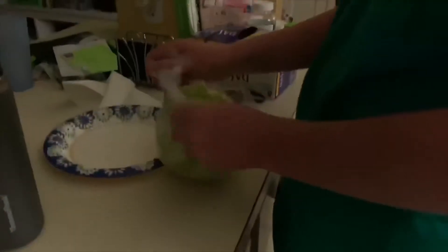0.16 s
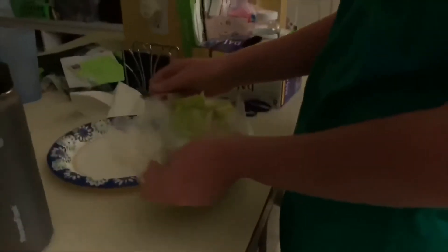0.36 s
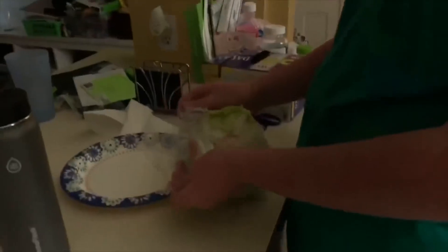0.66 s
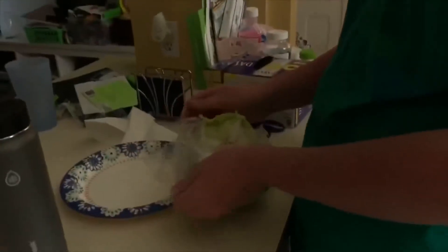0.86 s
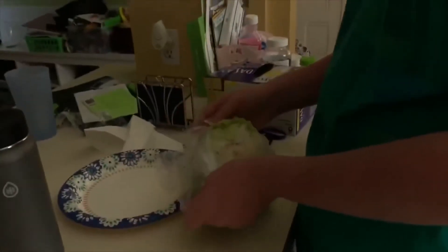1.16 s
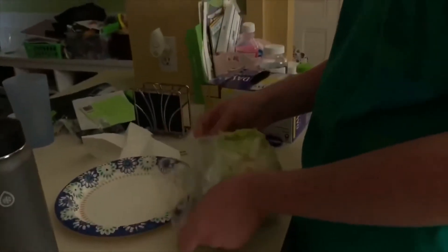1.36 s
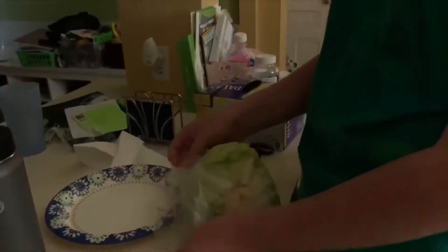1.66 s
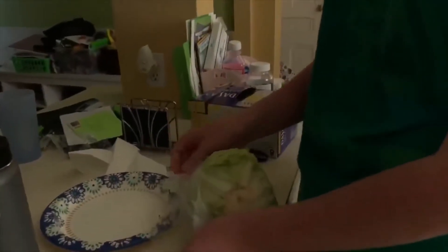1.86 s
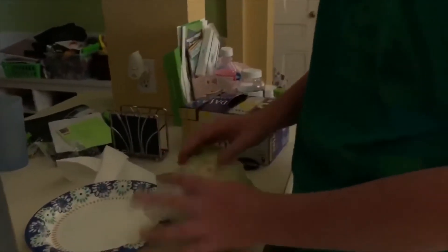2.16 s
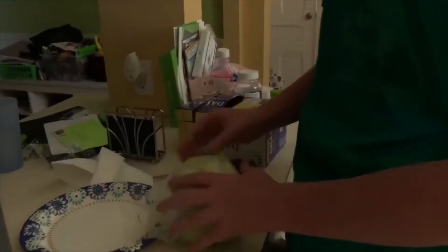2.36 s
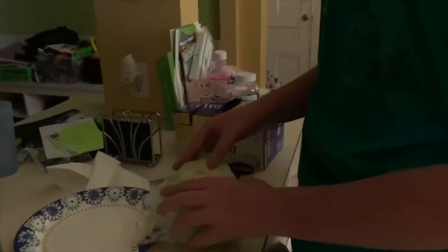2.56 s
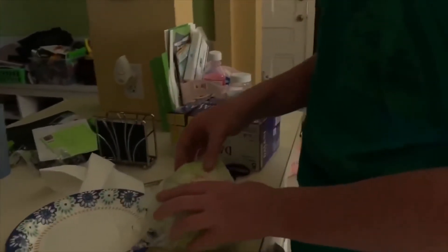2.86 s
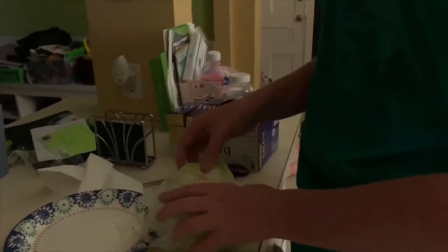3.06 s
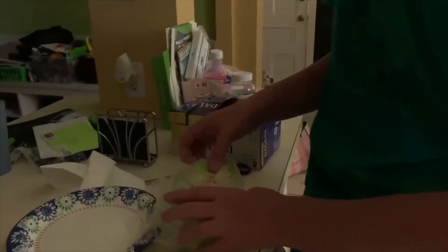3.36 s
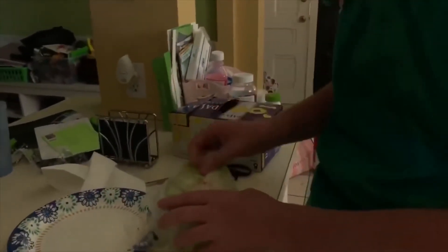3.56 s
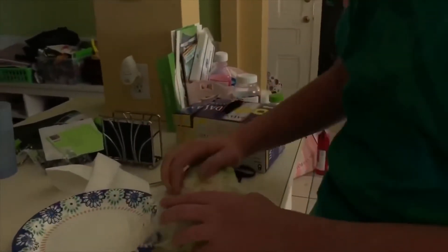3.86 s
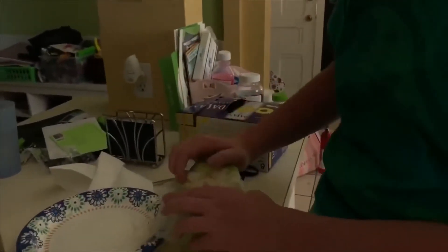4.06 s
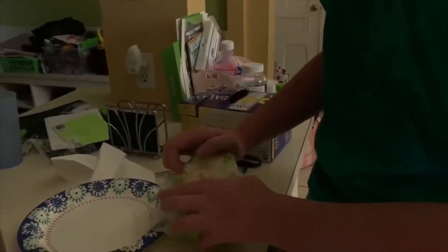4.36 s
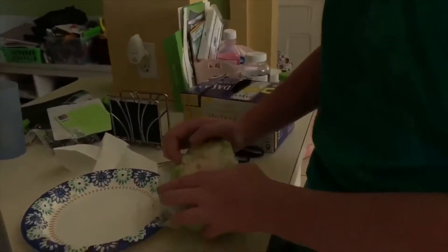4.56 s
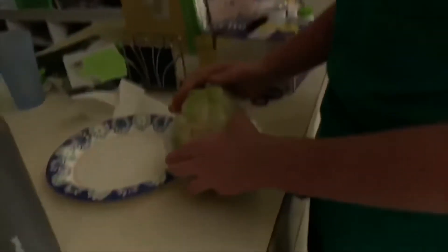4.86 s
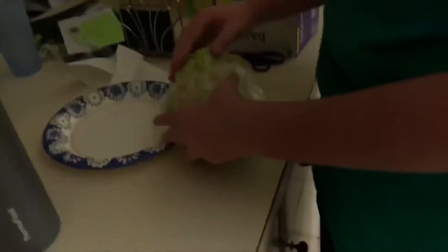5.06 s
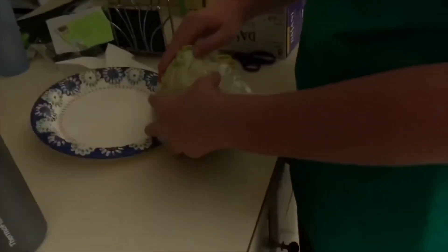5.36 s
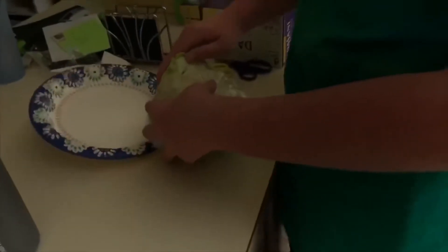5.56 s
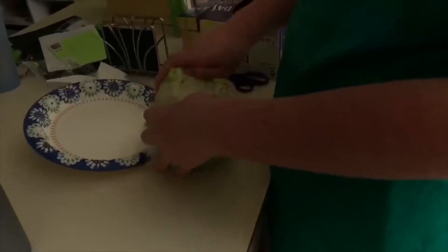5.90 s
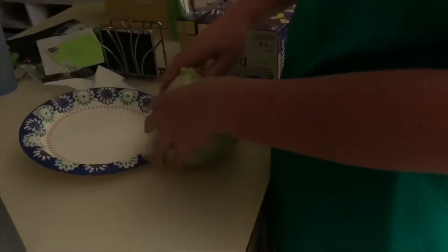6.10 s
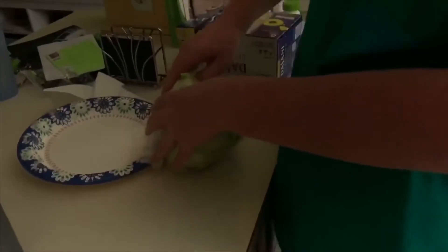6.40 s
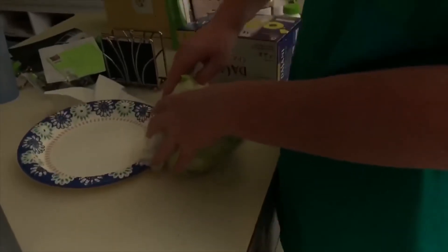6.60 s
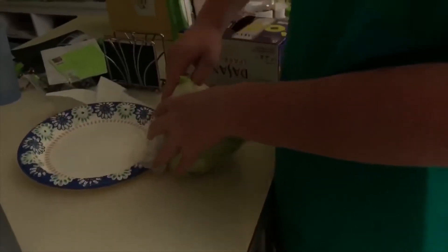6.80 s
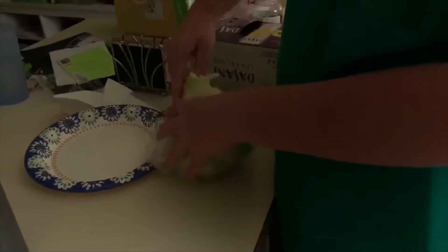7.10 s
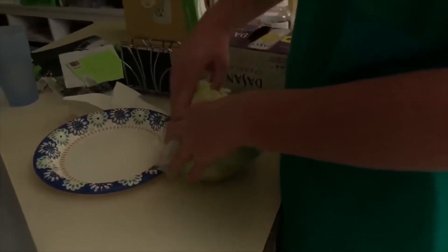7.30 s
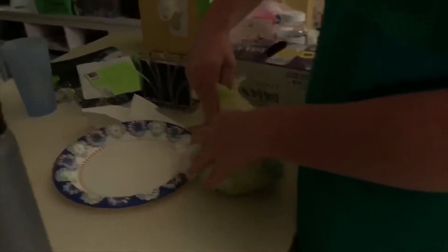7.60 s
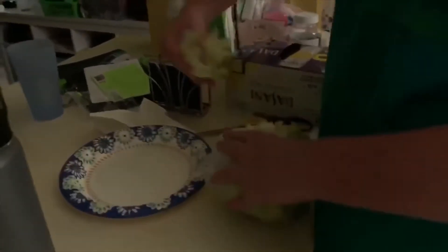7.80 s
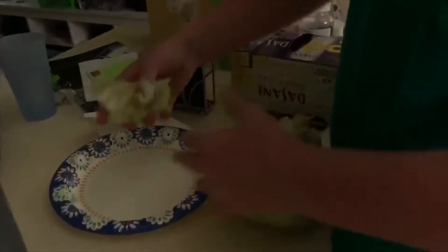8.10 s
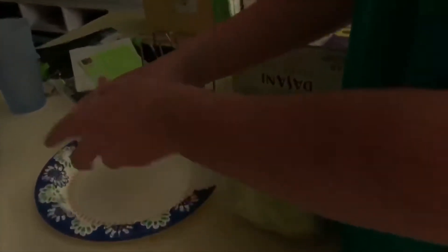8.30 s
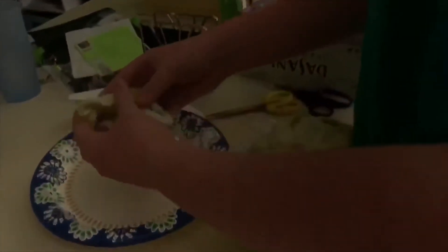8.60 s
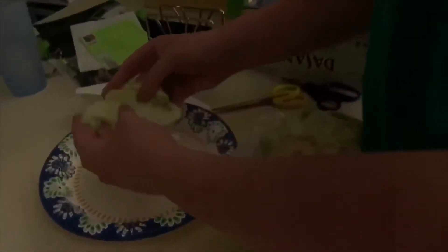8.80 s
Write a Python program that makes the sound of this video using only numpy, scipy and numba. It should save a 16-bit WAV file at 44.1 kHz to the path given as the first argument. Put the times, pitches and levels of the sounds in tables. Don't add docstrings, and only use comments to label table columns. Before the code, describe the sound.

Thin plastic film crackles off a head of lettuce, leaves rustle and crunch under fingers, then a rib snaps as a leaf is pulled away.

```python
import sys
import numpy as np
from scipy import signal
from scipy.fft import rfft, irfft, next_fast_len
from scipy.io import wavfile
from scipy.ndimage import map_coordinates
from numba import njit

SR = 44100
rng = np.random.default_rng(int(sys.argv[2]) if len(sys.argv) > 2 else 0)


def decibels_to_gain(level_db):
    exponent = np.asarray(level_db, float) / 20
    return 10 ** exponent


def persist_wave(psi):
    counts = np.round(np.clip(psi, -1, 1) * 32767).astype(np.int16)
    wavfile.write(sys.argv[1], SR, np.atleast_2d(counts).T)


N = 394560


def colour(points, hz):
    rows = np.array(points, float)
    return np.interp(np.log(np.maximum(hz, 1)), np.log(rows[:, 0]), rows[:, 1])


def tint(x, gain):
    size = next_fast_len(N, real=True)
    hz = np.arange(size // 2 + 1) * SR / size
    return irfft(rfft(x, size) * gain(hz), size)[..., :N]


def unit(x):
    return x / np.sqrt(np.mean(x ** 2))


@njit
def rings(count, start, turn, fade, size, skew):
    out = np.zeros((2, count))
    for k in range(len(start)):
        z, i = size[k] + 0j, int(start[k])
        step = fade[k] * np.exp(1j * turn[k])
        ahead = np.exp(1j * skew[k])
        life, rise = 1., 1.
        while life > .003 and i < count:
            out[0, i] += (1 - rise) * (z * ahead).imag
            out[1, i] += (1 - rise) * (z / ahead).imag
            z *= step
            life *= fade[k]
            rise *= max(1 - turn[k], 0.)
            i += 1
    return out


# (frequency [Hz], phase [rad])
SCATTER = [(300, .4), (1200, .7), (2500, 1.0), (3500, 1.1), (5500, 1.35), (6800, 1.1), (8000, .45),
           (16000, .5)]


def grains(s, hz, t60_s, size, place=0):
    columns = np.broadcast_arrays(s, hz, t60_s, size, place)
    s, hz, t60_s, size, place = (1. * a.ravel() for a in columns)
    turn = 2 * np.pi * np.minimum(hz, SR / 2.2) / SR
    fade = np.exp(-np.log(1000) / (t60_s * SR))
    return rings(N, np.clip(s * SR, 0, N), turn, fade, size, place * colour(SCATTER, hz))


def moves(s, fade_s, db, rise_s, hold_s=0):
    hop = 128
    late = np.arange(0, N + hop, hop)[:, None] / SR - s
    rising = np.maximum(-late, 0) / np.maximum(rise_s, .003)
    fading = np.maximum(late - hold_s, 0) / np.maximum(fade_s, .003)
    drop = np.minimum(rising + fading, 4)
    power = np.sum(decibels_to_gain(db - 20 * drop) ** 2, axis=1)
    return np.interp(np.arange(N), np.arange(len(power)) * hop, np.sqrt(power))


def port_noise(alike_hz):
    mid, side = rng.standard_normal((2, N))
    side = tint(side, lambda hz: np.minimum(hz / alike_hz, .4) ** 0.4 / (1 + (hz / 7800.0) ** 4))
    return mid + side * np.array([[1], [-1]])


# (frequency [Hz], density [dB per Hz])
KITCHEN = [(15, -54), (25, -32), (114, -10), (182, -4.5), (220, 0.5), (288, -6), (470, -9.5), (726, -17),
           (2900, -19.5), (13300, -35), (16500, -55)]
KITCHEN_DB = -60.5


def kitchen_air():
    return unit(tint(port_noise(1350.0), lambda hz: decibels_to_gain(colour(KITCHEN, hz)))) * decibels_to_gain(KITCHEN_DB)


# (frequency [Hz], width [Hz], level [dB])
FRIDGE = [
    (60.8, 8.7, -76),
    (117.9, 14, -69.5),
    (211.3, 24, -65),
    (240.4, 22, -78.5),
    (428.2, 6.1, -75),
    (471, 7, -71.5),
]


def fridge():
    out = 0
    for hum_hz, width_hz, db in FRIDGE:
        line = tint(port_noise(1700.0), lambda hz: 1 / (1 + (2 * (hz - hum_hz) / width_hz) ** 2))
        out = out + decibels_to_gain(db) * unit(line)
    return out


SWELL_SHARE = 0.42
GRIP_DB = -67.5
# (peak time [s], fade by 20 dB [s], level [dB])
SHIFTS = [(.03, 0.2, -46.5), (.13, 0, -45), (.55, 0.5, -64), (1.7, 0.5, -58), (2.64, -1, -66),
          (3.14, 0, -62), (3.51, -0.22, -42), (5.36, 0, -60), (6.03, -3.1, -55), (6.89, 0, -49),
          (7.7, 1, -65), (8.19, 0.2, -56), (8.56, 0.5, -59.5), (8.85, 0, -59)]
# (time [s], peak level [dB], pitch [Hz])
THUMPS = [
    (0.049, -60, 53.8),
    (6.855, -35.5, 70.0),
    (8.172, -40.5, 48),
    (8.2, -39, 36),
    (8.243, -44, 45),
    (.1, -46, 50),
    (8.53, -45, 59.2),
]


def grip():
    s, fade_s, db = np.transpose(SHIFTS)
    effort = np.hypot(decibels_to_gain(GRIP_DB), moves(s, fade_s, db, SWELL_SHARE * fade_s))
    rumble = tint(port_noise(1900.0), lambda hz: (hz / (hz + 47.0)) ** 2 / (1 + (hz / 60.) ** 3))
    s, db, hz = np.transpose(THUMPS)
    return unit(rumble) * effort + grains(s, hz, 7.4 / hz, decibels_to_gain(db))


# (time [s], length [s], slip rate [Hz], level [dB])
SQUEAKS = [
    (3.884, 0.018, 523, -35.5),
    (4.059, 0.015, 352, -32.5),
    (5.869, 0.066, 401, -47),
]


def squeaks():
    out = 0
    for s, length_s, slip_hz, db in SQUEAKS:
        slip_s = np.arange(24) / slip_hz * (1 + .016 * rng.standard_normal(24))
        fall = np.clip(1 - slip_s / length_s, 0, 1) ** 0.25
        swell = fall * np.clip(0.38 + slip_s / length_s, 0, 1)
        rib_hz = np.array([slip_hz, 1010.0, 1480.0, 2600.])
        rib_db = np.array([-0.5, -2.0, -1.5, -12.0])
        size = decibels_to_gain(db + rib_db + 3.6 * rng.standard_normal((24, 4))) * swell[:, None]
        out = out + grains(s + slip_s[:, None], rib_hz, 0.0095, size)
    return out


SNAP_S = 7.5887
# (delay [ms], frequency [Hz], level [dB], t60 [ms])
SNAP = [(0, 7900, -2, 2.4), (.1, 11500, -8, 2.2), (.2, 14600, -8, 2), (.2, 5600, -12, 2),
        (2, 13200, -17, 4), (.4, 3100, -8, 4.5), (.9, 1800, -11.5, 9), (2, 8200, -16, 3), (2, 730, -14, 15),
        (5, 420, -25, 25), (5, 280, -27, 30), (5, 170, -33, 50)]


def snap():
    ms, hz, db, t60_ms = np.transpose(SNAP)
    return grains(SNAP_S + ms / 1000, hz, t60_ms / 1000, decibels_to_gain(db))


def patches(s, hz, rate, per_octave):
    field = rng.standard_normal((int(N / SR * 30) + 9, 64))
    s, hz = np.broadcast_arrays(s, hz)
    where = [s * min(rate, 30), np.log2(hz / 100) * min(per_octave, 8)]
    return 1.4 * map_coordinates(field, where, order=1)


# (time [s], place [left positive])
PLACE = [(0, .1), (2, 0), (2.3, -.2), (3.1, -.15), (4.25, -.2), (5.6, 0), (5.85, .55), (6.1, .1), (7.5, .2),
         (8.2, .65), (8.95, .65)]


def cracks(s, db, body, cycles, smear_s, parts=6, patchy_db=0):
    u = rng.random((len(s), parts, 4))
    low_hz, high_hz = body[0][0], body[-1][0]
    hz = low_hz * (high_hz / low_hz) ** ((np.arange(parts) + u[..., 0]) / parts)
    late = -np.log(1 - u[..., 1])
    db = db[:, None] + colour(body, hz) - 2.0 * late
    db = db + patchy_db * patches(s[:, None], hz, rate=14., per_octave=2.711)
    place = .62 * (2 * u[..., 3] - 1) + .42 * patches(s[:, None], hz, rate=18., per_octave=7.)
    place = place + np.interp(s, *np.transpose(PLACE))[:, None] * (hz < 7000)
    size = decibels_to_gain(db) * np.sign(u[..., 2] - .5)
    return grains(s[:, None] + smear_s * late, hz, cycles / hz, size, place)


# (time [s], peak level [dB], pitch [Hz])
CRUNCHES = [(0.13, -40, 390), (0.295, -36, 487), (0.979, -42, 1560), (1.026, -40, 1030),
            (1.06, -41.5, 1490), (1.455, -40.5, 1890), (1.87, -46, 1470), (2.305, -43.5, 1500),
            (3.373, -47, 1680), (3.4, -30, 1970), (3.449, -28.5, 1750), (3.867, -44, 522),
            (4.0595, -40, 2290), (4.751, -46.5, 1030), (4.817, -44, 940), (5.882, -40.5, 504),
            (5.907, -41.5, 400), (6.246, -38.5, 2120), (6.309, -40.5, 1480), (6.423, -37, 2200),
            (6.457, -39, 560), (6.614, -48, 1450), (6.716, -42, 1490), (6.753, -32.5, 1440),
            (6.81, -33, 1460), (6.854, -28, 1480), (6.858, -31.5, 710), (6.872, -30, 1690),
            (6.876, -32, 740), (6.886, -32, 1830), (6.922, -34, 700), (7.408, -36, 2160), (7.517, -38, 700),
            (8.818, -42, 980), (8.847, -36, 743), (.442, -46, 1610), (1.271, -45, 2240),
            (1.332, -41.5, 880), (1.748, -43.5, 400), (1.957, -46.5, 2470), (2.005, -47, 1560),
            (2.277, -44, 415), (2.531, -43, 1320), (3.317, -46.5, 1370), (3.335, -45, 1400),
            (5.006, -46, 589), (6.036, -43.5, 1770), (6.331, -43, 1390), (7.615, -29, 1490),
            (7.853, -46.5, 471), (8.031, -48, 415), (8.551, -51, 616)]
RIB_T60_S = 0.037


def crunches():
    s, db, hz = np.transpose(CRUNCHES)
    return cracks(s, db + 0.5, CRUNCH, 3.15, 0.0033) + grains(s, hz, RIB_T60_S, decibels_to_gain(db - 2.5))


# (time [s], peak level [dB])
FILM_CRACKS = [(0.1048, -33), (0.406, -29.5), (0.54, -38), (0.606, -35), (0.7113, -43), (0.753, -37),
               (0.841, -26), (0.9732, -38), (1.0241, -27.5), (1.111, -30), (1.1607, -33.5), (1.2354, -32.5),
               (1.4565, -31), (1.503, -25), (1.5934, -34.5), (1.729, -46), (1.957, -35), (1.9994, -41),
               (2.023, -34.5), (2.044, -31.5), (2.176, -37), (2.2166, -36), (2.2343, -26), (2.4264, -34),
               (2.4613, -31.5), (2.814, -50), (0.6938, -46), (0.9363, -43), (1.8193, -40), (2.7296, -48),
               (1.078, -36)]
# (time [s], peak level [dB])
LEAF_CRACKS = [(2.9605, -48), (2.988, -33), (3.0227, -38.5), (3.078, -41), (3.14, -38.5), (3.1599, -32),
               (3.1892, -40), (3.225, -36), (3.316, -34), (3.329, -33), (3.3732, -31.5), (3.402, -22),
               (3.597, -35.5), (4.173, -57), (4.191, -42), (4.2847, -29.5), (4.309, -30), (4.492, -37),
               (4.7322, -33), (4.792, -35.5), (4.8317, -37), (4.888, -35.5), (5.178, -41), (5.1974, -32),
               (5.256, -38.5), (5.3255, -42), (5.3857, -40), (5.682, -30.5), (5.7373, -33), (5.765, -33),
               (5.7736, -32), (3.005, -41), (3.087, -40), (3.7255, -48), (3.7497, -44.5), (3.7922, -36),
               (3.8706, -39), (4.0138, -38.5), (4.0525, -39), (4.5201, -55), (4.5261, -54), (4.7007, -34),
               (4.818, -39), (4.9194, -38), (5.059, -39.5), (5.1153, -46), (5.469, -35.5), (5.843, -35),
               (5.516, -42),
               (6.1271, -32.5), (6.182, -33), (6.24, -27), (6.318, -29.5), (6.4233, -36), (6.453, -30),
               (6.54, -31), (6.602, -51), (6.6206, -30), (6.717, -30.5), (6.7514, -25), (6.8098, -24.5),
               (6.852, -34), (7.1973, -39), (7.3484, -35), (8.022, -30), (8.3213, -33), (8.5606, -39),
               (8.63, -39), (8.737, -42), (8.8193, -29), (8.8585, -28.5), (8.7755, -28), (8.779, -29.5),
               (7.2468, -38.5), (7.3328, -48), (7.8511, -44), (8.4323, -43), (8.6044, -41),
               (4.2915, -35), (4.087, -36), (4.121, -40), (4.021, -37), (4.004, -43), (4.184, -43), (4.263, -41),
         (6.0138, -38), (3.452, -27), (3.41, -27), (6.1026, -38.5), (6.139, -35), (6.248, -40),
         (6.3351, -36), (6.612, -47), (6.6554, -44), (6.7871, -35), (7.884, -40), (8.1828, -44),
         (8.2253, -37), (8.472, -41), (8.576, -42), (8.943, -37)]
# (frequency [Hz], level [dB])
TICK = [(3500, -44), (6500, -40), (9000, 5.5), (12000, 3.5), (16000, 6.5)]
CRACK_DB = -5


def bright_cracks():
    s, db = np.transpose(FILM_CRACKS + LEAF_CRACKS)
    db = db + CRACK_DB
    tick = cracks(s, db + 6.0, TICK, cycles=11, smear_s=.00025, parts=8)
    return tick + cracks(s, db - 7.0, CRINKLE, cycles=40.0, smear_s=0.0016, parts=16)


# (peak time [s], fade by 20 dB [s], level [dB])
UNWRAP = [(0.006, 0.11, -40), (.14, 0.15, -44), (.25, 0.2, -41.5), (.449, 0.28, -40.5), (.76, 0.2, -50.5),
          (.89, 0.2, -53), (2.11, 0.2, -61), (1.063, 0.28, -44.5), (1.207, 0.06, -46.5),
          (1.365, 0.51, -40.5), (1.623, 0.12, -45.5), (1.77, 0.2, -48), (1.87, 0.35, -49),
          (1.985, 0.8, -60), (2.04, 0.4, -60), (2.24, 0.24, -45.5), (2.318, 0.04, -39.5),
          (2.432, 0.29, -47.5), (2.6, 0.24, -55), (2.73, -0.2, -61), (2.815, -0.56, -52), (.54, 0.2, -48.5)]
# (peak time [s], fade by 20 dB [s], level [dB], body crunch [dB])
PICKS = [(3.028, 0.12, -51.5, -24), (3.21, 0.3, -54, -15), (3.256, -0.01, -44, -7.5),
         (3.337, 0.21, -48, -6), (3.386, -0.26, -48.5, -14), (3.55, 0.3, -57, -2.5),
         (3.796, 0.13, -52, -9.5), (3.885, 0.2, -50.5, -2.5), (3.997, -0.06, -50, -5),
         (4.07, 0.12, -49, -4), (4.115, 0.2, -54, -6), (4.195, 0.16, -50.5, -9), (4.29, 0.5, -51.5, -6.5),
         (4.624, 0.73, -50.5, -4), (4.739, 0.3, -52.5, -8), (4.835, 0.1, -49, -5), (4.924, .17, -48, -12.5),
         (5.008, 0.01, -52.5, -1), (5.186, .5, -53, -13), (5.392, 0.25, -47, -7), (5.47, -0.3, -60, -15.5),
         (5.549, -0.04, -46, -13), (5.059, -0.04, -47.5, -7), (3.085, 0, -61, -25), (3.6, 0, -56, -8.5),
         (5.683, 0.1, -54.5, -7), (5.76, 0.5, -59.5, -12.5), (5.8, .1, -53.5, -9),
         (5.88, 0.23, -45.5, -11.5), (6.0, .4, -49, -8.5)]
# (peak time [s], fade by 20 dB [s], level [dB], body crunch [dB])
PULLS = [(6.141, 0.42, -49, -6.5), (6.252, 0.4, -51.5, -3), (6.315, 0.1, -49.5, -3.5),
         (6.473, 0.35, -46, -4), (6.624, 0.12, -47, -3), (6.753, 0.1, -42.5, -3.5),
         (6.83, 0.28, -43.5, -2.5), (6.95, 0.2, -45, -15), (7.01, 0.17, -40, -12), (6.54, 0, -53.5, -6),
         (7.519, -0.14, -38, -13), (7.201, 0, -51, -3), (7.28, 1, -59.5, -2.5), (7.412, 0.24, -44, -3.5),
         (7.902, 0.19, -45.5, -6.5), (8.022, 0.15, -45, -11), (8.07, 0.5, -55, -4.5),
         (8.234, 0.13, -48.5, -26), (8.31, 0.2, -56, -19), (8.4, 0.4, -59.5, -14),
         (8.457, 0.24, -53.5, -11.5), (8.59, 0, -48, -15), (8.636, 0.1, -46, -16), (8.78, 0.15, -40, -9),
         (8.845, 0.35, -46.5, -11.5), (8.94, 0, -43, -15)]
# (start [s], running [s], fade by 20 dB [s], level [dB], body crunch [dB])
TEAR = [
    (.15, 0.052, 0.04, -40, -12.5),
    (0.263, 0.083, 0, -39.5, -7.5),
    (.836, 0.029, 0.05, -45, -9.5),
    (.975, 0.028, 0, -42, -4),
    (3.401, 0.014, 0.09, -34.5, -5.5),
    (3.449, 0.022, 0.1353, -39.5, -4.5),
    (6.852, 0.052, 0.0963, -34.5, -3),
    (7.595, 0.017, 0.16, -31.5, -5),
    (8.756, 0.048, -0.02, -41, -8.5),
]
# (start [s], running [s], fade by 20 dB [s], level [dB], body crunch [dB])
RIPS = [(8.736, .003, 0.03, -39.5, -8), (8.82, 0.0058, -0.03, -35.5, -10.5),
        (8.857, 0.0023, -0.07, -41, -10.5), (1.025, .003, -0.13, -43, -5), (4.8, 0.0035, 0.1, -48, -16),
        (6.24, 0.0037, 0, -56, -11), (5.774, .003, 0.1, -48, -14), (3.8, .002, -0.3, -55.5, -20),
        (2.3, .003, -0.1, -43, -10), (8.032, 0.0027, .015, -49, -7), (6.871, .006, 0.0466, -36, -1),
        (6.918, 0.0062, 0.05, -40.5, -2.5)]
TEAR_START_S, RIP_START_S = 0.026, 0.0044
HANDS_DB, CRUNCH_DB, FILM_CRUNCH_DB = 1, -1, -8


def hands(body):
    unwrap = [(*row, FILM_CRUNCH_DB) for row in UNWRAP]
    s, fade_s, db, low_db = np.transpose(unwrap + PICKS + PULLS)
    handling = moves(s, fade_s, db + body * low_db, SWELL_SHARE * fade_s)
    s, hold_s, fade_s, db, low_db = np.transpose(TEAR)
    tearing = moves(s, fade_s, db + body * low_db, TEAR_START_S, hold_s)
    s, hold_s, fade_s, db, low_db = np.transpose(RIPS)
    ripping = moves(s, fade_s, db + body * low_db, RIP_START_S, hold_s)
    return np.sqrt(handling ** 2 + tearing ** 2 + ripping ** 2) * decibels_to_gain(HANDS_DB + body * CRUNCH_DB)


def swarm(body, count, spread_db, cycles, smear_s):
    u = rng.random((count, 4))
    starts = rng.random(500) * N / SR
    flurry = starts[(u[:, 2] * len(starts)).astype(int)] - .014 * np.log(1 - u[:, 0])
    s = np.where(u[:, 3] < .45, flurry, u[:, 0] * N / SR)
    db = np.minimum(-np.log(1 - u[:, 1]), 3) * spread_db
    return unit(cracks(s, db, body, cycles, smear_s, parts=3, patchy_db=3.0))


# (frequency [Hz], level [dB])
CRINKLE = [(2500, -14.5), (4000, -3), (6000, -2.5), (8000, 0.5), (10000, 5.5), (12500, 2.5), (15000, 5.5),
           (16800, -3.5)]
# (frequency [Hz], level [dB])
CRUNCH = [(250, -11.5), (450, -8), (750, -3.5), (1100, -2.5), (1550, 6.5), (2000, 5), (2800, 12)]
POPS_DB = -11


def rustle():
    crinkle = swarm(CRINKLE, count=40000, spread_db=1.7, cycles=27.0, smear_s=.0008)
    crunch = swarm(CRUNCH, count=12000, spread_db=2.0, cycles=9.9, smear_s=0.001212)
    pops = swarm(CRINKLE, count=1600, spread_db=2.5, cycles=22., smear_s=.0006)
    return (crinkle + decibels_to_gain(POPS_DB) * pops) * hands(0) + crunch * hands(1.0)


# (frequency [Hz], level [dB])
WALLS = [(200, -15), (1500, -14), (5000, -16), (8500, -24), (16000, -26)]
ROOM_T60_S = .25


def walls(near):
    t = np.arange(SR // 2) / SR
    echo = rng.standard_normal((2, len(t))) * decibels_to_gain(-60 * t / ROOM_T60_S) * (t > .003)
    echo = echo / np.sqrt(np.sum(echo ** 2, axis=1, keepdims=True))
    return signal.fftconvolve(tint(near, lambda hz: decibels_to_gain(colour(WALLS, hz))), echo, axes=1)[:, :N]


# (frequency [Hz], phase [rad])
PORTS = [(0, 0), (1550, -0.1), (2580, 1.9), (5510, 3.6), (6500, 2.6), (7580, 0.3), (8150, -.1),
         (9200, -2.6), (10300, -3.7), (11200, -5.9), (12100, -6.7), (13000, -9), (14100, -9.9),
         (14800, -12.1), (16600, -13)]
# (frequency [Hz], level [dB])
BALANCE_DB = [(60, 0.0), (110, -0.5), (200, -2.0), (380, -1.0), (700, 0.5), (1290, 2.5), (2380, 1),
              (4400, -1.0), (8120, -0.5), (15000, 0.5)]


def ports(sound):
    lead_hz, lead = np.transpose(PORTS)

    def split(hz):
        half = np.exp(1j * np.interp(hz, lead_hz, lead) / 2) * decibels_to_gain(colour(BALANCE_DB, hz) / 2)
        return half ** np.array([[1], [-1]])
    return tint(sound, split)


def scene():
    around = kitchen_air() + fridge() + grip()
    near = squeaks() + snap() + crunches() + bright_cracks() + rustle()
    near = tint(near, lambda hz: hz ** 2 / (hz ** 2 + 98.0 ** 2))
    return ports(near + around) + walls(near)


def roll_off(x):
    return signal.sosfilt(signal.butter(12, 17040, fs=SR, output="sos"), x)


def record(dry):
    top_hz = 15900
    mix = tint(dry, lambda hz: np.where(hz > top_hz, decibels_to_gain(-34.0), 1))
    return roll_off(mix)


dry = scene()
out = record(dry)
persist_wave(out)
```